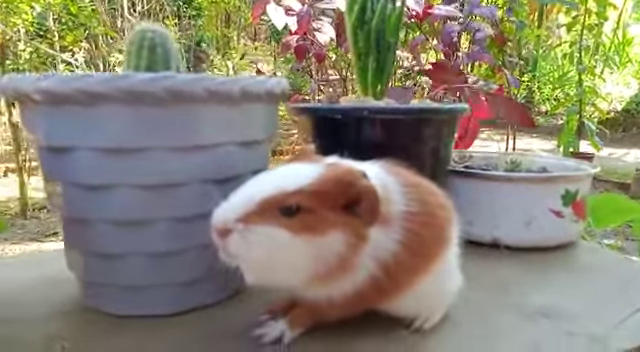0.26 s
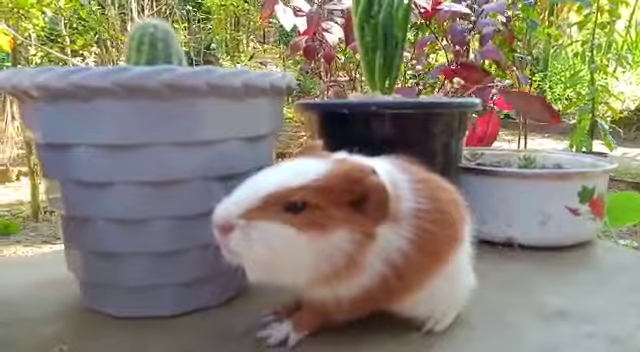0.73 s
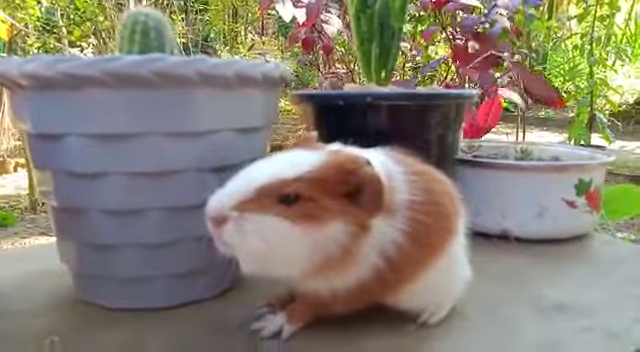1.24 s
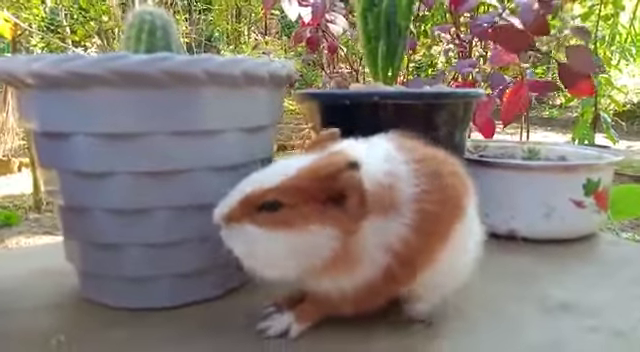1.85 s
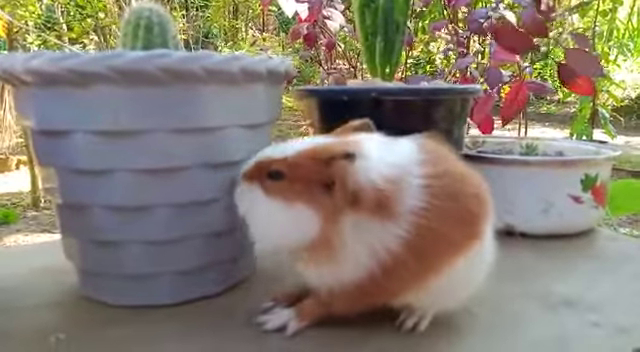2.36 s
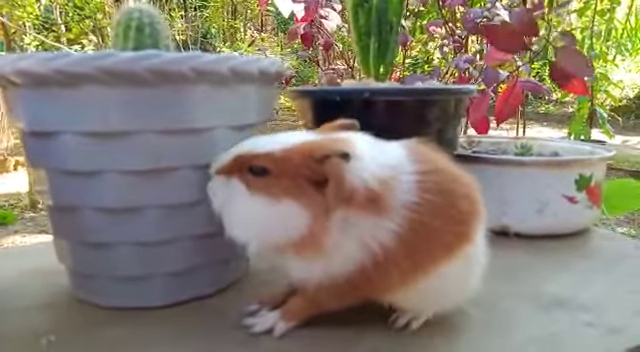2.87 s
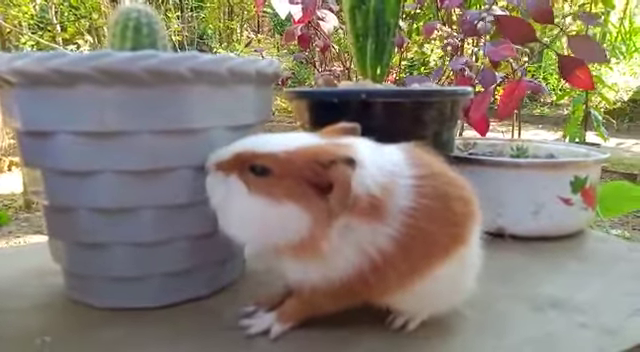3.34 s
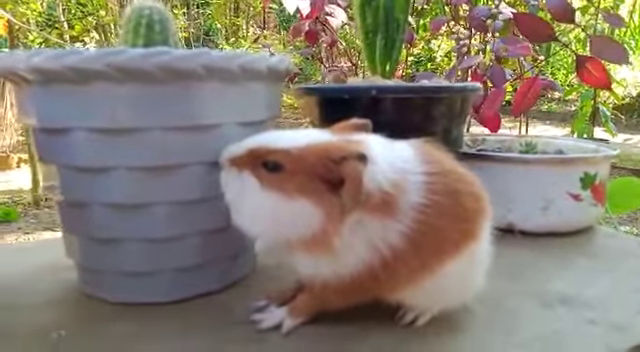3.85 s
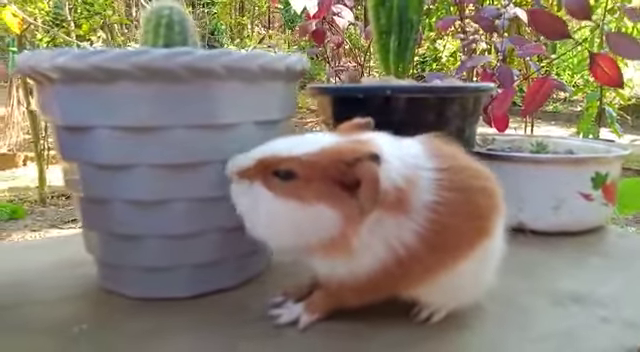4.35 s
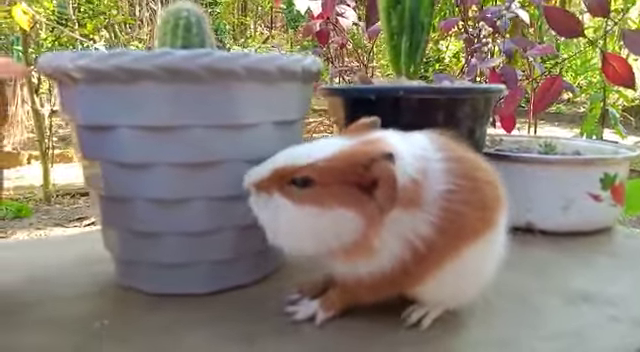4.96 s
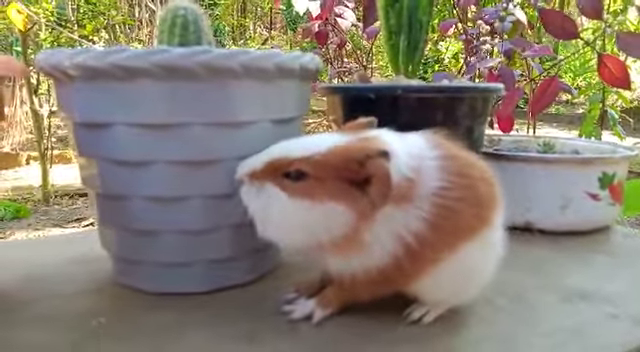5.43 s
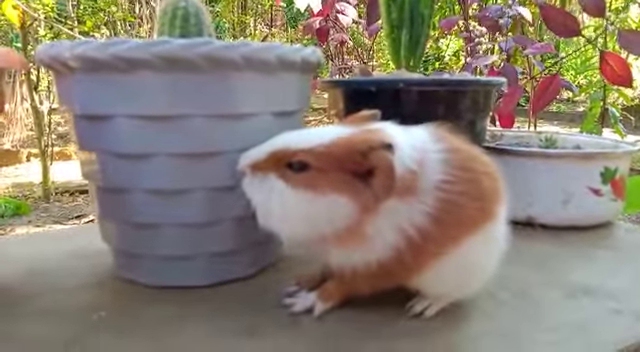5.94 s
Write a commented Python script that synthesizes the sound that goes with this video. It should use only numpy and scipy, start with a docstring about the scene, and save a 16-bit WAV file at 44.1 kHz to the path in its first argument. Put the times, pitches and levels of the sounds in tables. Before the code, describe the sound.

A guinea pig calls very close and almost dry on an outdoor patio, about six seconds long. It starts at once with a wheek: a nasal buzz near 650 Hz, a fast upward glide with rasp and breathy hiss, then a clean whistle around 3 kHz, cut off abruptly. Sixteen such calls follow, each 0.2 to 0.3 seconds, roughly 0.3 to 0.5 seconds apart. A single hard, hollow knock clicks at 0.7. From 1.3 to 3.1 the calls come quicker; those around 2.4 to 3.1 have the strongest, most piercing whistles with a little fizz. At 4.85 one call drops straight out of the previous whistle. The last begins at 6.1. Underneath run a faint low hum throbbing about thirty times a second, like a far idling engine, and soft garden air. Distant poultry-like hoots appear now and then, clearest near 4.7, with tiny bird chirps mainly between 4.3 and 5.3.

```python
"""On a garden patio, a guinea pig wheeks sixteen times, close to the microphone.
Each wheek is a stack of harmonics on a gliding pitch: a low buzzy note, a raspy rise, a clean whistle.
Shaped noise adds rasp, hiss and fizz, and a shaped impulse makes one sharp knock.
Behind them are a throbbing low hum with rumble and faint garden air (sines and noise),
far hooting calls (sines with overtones) and small birds (sine chirps, blurred)."""
import sys
import numpy as np
from scipy import signal
from scipy.fft import rfft, irfft
from scipy.io import wavfile
from scipy.ndimage import uniform_filter1d

SR = 44100
rng = np.random.default_rng(int(sys.argv[2]) if len(sys.argv) > 2 else 0)


def file_out(sig):
    """Save sig as 16-bit WAV at sys.argv[1]."""
    # one column per channel
    cols = np.atleast_2d(sig).T
    # limit, then scale
    lim = np.clip(cols, -1, 1)
    pcm = np.round(lim * 32767).astype(np.int16)
    wavfile.write(sys.argv[1], SR, pcm)


N = 273420
T = np.arange(N) / SR  # time of every sample, in seconds

# The wheeks, one a row; levels are before the gains added later:
# (start [s], time on the low note [s], time of the glide [s], time of the climb into the whistle [s],
#  length [s], first pitch [Hz], low note [Hz], whistle pitch aimed at [Hz],
#  bend of the glide [1 = even], share of pitch lost at the end [0-1],
#  buzz level [dB], glide level [dB], whistle level [dB], fade of the whistle [dB, negative swells],
#  buzz brightness [dB], glide brightness [dB], whistle brightness [dB], rasp level [dB], hiss level [dB])
WHEEKS = [ (0.0, 0.013, 0.093, .125, 0.25, 661, 653, 3112, 1.13, 0.0026, -26, -40.5, -44.5, -7, -3.5, -19, 22, -36.5, -62),
          (.412, 0.075, 0.11, .117, 0.27, 722, 677.7, 3210, 1.11, 0.064, -32, -38.5, -53.5, -11, -3.5, -15.5, 20.5, -36.5, -63.5),
          (0.876, 0.057, 0.13, 0.051, 0.24, 652, 628, 2606, 1.24, .26, -33.5, -35.5, -39.5, -10, -6, -28, -33.5, -52, -73.5),
          (1.301, 0.071, 0.092, 0.078, 0.22, 687, 635, 3373, 0.93, .16, -35, -36.5, -41.5, -2, -7.5, -35, -22, -67, -92),
          (1.675, 0.072, 0.08, .071, 0.23, 697, 610, 3283, 1.23, .015, -31, -34.5, -45, 0.5, -7, -36, -26, -41.5, -84),
          (2.025, 0.064, 0.082, 0.08, 0.26, 633, 604, 3270, 1.23, .02, -31, -34.5, -49, -6, -6, -52, -9, -47, -78),
          (2.391, 0.021, 0.057, 0.068, 0.23, 706, 774, 3113, 1.89, .07, -26.5, -34.5, -19.5, 0.5, -10.5, 2, 7.5, -69, -65),
          (2.73, 0.039, 0.088, 0.11, 0.26, 698, 765, 3085, 2.13, 0.037, -24, -27, -17.5, 9.5, 2, 5, 12.5, -58, -56),
          (3.108, 0.06, 0.11, 0.16, 0.3, 695, 707.5, 3089, 1.2, 0.052, -26.5, -32, -27.5, -2.5, 0.5, 0.5, 10, -34, -54.5),
          (3.568, .076, 0.11, .1, 0.29, 745, 684.5, 3027, 1.1, 0.012, -31, -38.5, -37, -4, -1, 0.5, 8.5, -37.5, -58),
          (4.025, .075, .123, .18, .277, 713, 665, 3439, 1.06, .11, -31.5, -37, -41.5, -8.5, -4.5, -5.5, 4.5, -39, -61),
          (4.565, 0.055, 0.13, 0.12, 0.29, 626, 636, 2993, 1.5, 0.17, -24.5, -31, -39, -7, -2.5, -21, 3, -56.5, -66),
          (4.853, 0.072, 0.095, 0.074, 0.21, 2796, 642, 3339, 1.44, .14, -28.5, -35.5, -43.5, -10, -1.5, -9, -20, -37, -63.5),
          (5.21, 0.045, 0.085, 0.11, .27, 696, 675.6, 3124, 1.45, 0.014, -30.5, -35, -35.5, -3, -9.5, -24, 16.5, -37.5, -67),
          (5.641, 0.074, .11, 0.14, 0.28, 702, 677, 3257, 1.02, .085, -32, -36.5, -43.5, -7.5, -4, -9, 7.5, -37, -70),
          (6.105, 0.07, 0.11, 0.091, 0.28, 694, 648, 3000, 1.06, .05, -34, -37.5, -38, 0, -8.5, -8.5, 9, -53, -77)]
# How the throat colours the overtones: (frequency [Hz], level [dB])
THROAT_COLOUR = [(1200, -6.5), (2100, -2), (3000, -5.5), (4000, -11.5), (5200, -20), (6200, -14.5),
                 (7200, -14.5), (9100, -8), (10500, -18), (12200, -17), (13500, -12), (15200, -26)]
# Peaks and dips that the lowest harmonic sweeps through: (frequency [Hz], level [dB])
FUNDAMENTAL_COLOUR = [(650, -1), (900, -0.5), (1030, -0.6), (1400, -0.1), (1650, 2.2), (2150, 4.5),
                      (2400, -6.5), (2520, 3.5), (2680, -9.5), (2820, 1.8), (3100, 5.5)]
# Colour of the hiss of leaking breath: (frequency [Hz], relative level [dB])
HISS_COLOUR = [(2500, -26), (4200, -4), (5300, -24), (6300, 0), (7100, 6.5), (8000, -3), (9300, -4.5),
               (10600, -24), (12500, -22.5), (14200, -17), (16000, -21.5)]
# Colour of the low rumble: (frequency [Hz], relative level [dB])
RUMBLE_COLOUR = [(13, -50), (22, -38.5), (32, -35), (59, -18.5), (81, -0.5), (114, 4), (130, -4), (151, -4),
                 (184, -5), (205, -7), (301, -15), (358, -15.5), (420, -22), (550, -44.5), (920, -120)]
# Colour of the garden air: (frequency [Hz], relative level [dB])
AIR_COLOUR = [(200, -22.5), (380, 0.5), (1000, -1), (1800, -3), (3200, -6), (4500, -12), (5900, -25.5),
              (7200, -16.5), (9500, -36), (11500, -27.5), (13500, -32.5), (15500, -55)]
# Steady notes in the hum, before throb and swell: (mean pitch [Hz], level [dB])
HUM_NOTES = [(108, -56), (124, -51)]
# Slow swell of the hum and rumble: (time [s], level [dB])
HUM_SWELL = [(0, 0.5), (1.2, -1), (2.2, 2.5), (3.2, -0.5), (4.7, -1.5), (6.2, 1)]
# Far hooting calls, before the gain of the far sounds:
# (start [s], end [s], first pitch [Hz], last pitch [Hz], level [dB], overtones against the lowest tone [dB])
HOOTS = [(.05, 0.443, 355, 327, -60.5, -30), (1.8, 2.074, 366.7, 370.8, -56, -6.5),
         (2.55, 2.999, 338.8, 334, -56.5, -29), (2.62, 2.897, 461.3, 520.4, -60, 10),
         (3.836, 3.996, 492, 472.5, -70.5, 18), (4.13, 4.298, 499, 483.6, -56, -8),
         (4.7, 4.87, 483, 467.5, -48, -14.5), (5.757, 5.881, 445.6, 423.3, -54, -3),
         (5.99, 6.085, 865, 798, -54.5, -40)]
# Colour of the knock: (frequency [Hz], relative level [dB])
KNOCK_COLOUR = [(40, -17), (150, -7.5), (600, 1), (1000, -4), (1600, -19), (1950, -21), (2400, -16),
                (3000, -8), (4000, -17), (4600, -30), (5400, -25.5), (8300, -42), (13500, -50),
                (16000, -53)]
# Small birds, before the gain of the far sounds:
# (start [s], end [s], first pitch [Hz], last pitch [Hz], level [dB])
CHIRPS = [(1.702, 2.252, 6830, 6606, -69.5), (4.316, 4.408, 2323, 2084, -56.5),
          (4.524, 4.576, 4100, 3513, -47), (4.546, 4.603, 7706, 7334, -58.5),
          (5.071, 5.196, 2736, 2477, -55), (5.132, 5.214, 10080, 9880, -63.5),
          (5.182, 5.226, 13200, 13190, -64), (5.138, 5.261, 6100, 6000, -63),
          (5.964, 6.017, 10170, 10000, -74.5)]
# How long the patio rings in each band: (frequency [Hz], time to die by 60 dB [s])
PATIO_RING = [(300, 0.53), (3000, 0.41), (9000, 0.33), (15000, 0.17)]

EDGE_HZ = 15800  # upper limit of the sound
KNOCK_S = .7152  # time of the knock
# Pitch: settles on the low note, glides to the register break, eases into the whistle, droops at the end
SETTLE_S, BREAK_HZ, EASE_POWER, DROOP_S = .042, 2363, 2.5, .01
# Level: shares of glide and climb where glide level and whistle crest are reached; latest crest before the end
GLIDE_SHARE, CREST_SHARE, CREST_LEAD_S = 0.48, 0.86, 0.034
# Depth [dB] and time constant [s] of the soft start and end
ATTACK_DB, ATTACK_S, RELEASE_DB, RELEASE_S = 13.5, 0.014, 15, .008
# Brightness: dulls as the pitch rises to DULL_HZ, then opens across the break
DULL_HZ, OPEN_LEAD_S, OPEN_LAG_S = 1500, 0.03, 0.051
# Above this level, a swell goes more into the lowest harmonic (SQUEEZE: dB of brightness lost per dB)
KNEE_DB, SQUEEZE = -28, 0.75
# The rasp sets in just after the pitch lifts and lets go just before the break
RASP_LAG_S, RASP_LEAD_S, RASP_FADE_S = .02, 0.0078, .016
FLUTTER = .27  # depth of the rasp's second oscillation
# Waver of pitch on each part (shares), and of level in the glide (dB)
BUZZ_WAVER, GLIDE_WAVER, WHISTLE_WAVER, GLIDE_WAVER_DB = .008, .016, .0018, 1.2
# A loud whistle breaks into a spurt of fizz shortly before it ends
SPURT_LEAD_S, SPURT_S, SPURT_RISE_DB = 0.028, 0.041, 13


def gain_of(db):
    """Turns decibels into amplitude."""
    return 10 ** (np.asarray(db) / 20)


def evened(x):
    """Scales a sound to an average strength (rms) of 1."""
    return x / np.sqrt(np.mean(x ** 2) + 1e-20)


def read(points, hz):
    """Reads a table between its points, on a logarithmic frequency axis."""
    point_hz, value = np.transpose(points)
    return np.interp(np.log(hz + 1), np.log(point_hz), value)


def shaped_noise(gain):
    """Noise of rms 1: random samples with each frequency scaled by a gain."""
    spectrum = rfft(rng.standard_normal(N))
    return evened(irfft(spectrum * gain, N))


def noise(points):
    """Noise of rms 1 with the colour in a table."""
    hz = np.fft.rfftfreq(N, 1 / SR)
    return shaped_noise(gain_of(read(points, hz)))


def band(centre_hz, width_hz):
    """Noise of rms 1 in a bell-shaped band; around zero it is a random wander."""
    hz = np.fft.rfftfreq(N, 1 / SR)
    return shaped_noise(np.exp(-((hz - centre_hz) / width_hz) ** 2 / 2))


def gate(start, end, fade):
    """Is one between two times, with straight ramps centred on them."""
    return np.clip(np.minimum(T - start, end - T) / fade + .5, 0, 1)


def phase_of(hz):
    """Adds up a pitch curve into the running phase of a wave."""
    return 2 * np.pi * np.cumsum(hz) / SR


def wheek(start, hold, glide, climb, length, first_hz, low_hz, top_hz, bend, droop,
          buzz_db, glide_db, whistle_db, fade_db, buzz_bright_db, glide_bright_db, whistle_bright_db):
    """Plans one call as rows of time, pitch, level and brightness: low note, glide to the break, whistle."""
    t = np.arange(0, length, 1 / 4000)
    at_break = hold + glide

    settling = np.clip(1 - t / SETTLE_S, 0, 1) ** 2
    gliding = np.clip((t - hold) / glide, 0, 1) ** bend
    climbing = 1 - np.clip(1 - (t - at_break) / climb, 0, 1) ** EASE_POWER
    hz = low_hz * (first_hz / low_hz) ** settling * (BREAK_HZ / low_hz) ** gliding
    hz = hz + (top_hz - BREAK_HZ) * climbing
    hz = hz * (1 - droop * np.exp((t - length) / DROOP_S))

    crest = min(at_break + CREST_SHARE * climb, length - CREST_LEAD_S)
    level_db = np.interp(t, [hold, hold + GLIDE_SHARE * glide, at_break, crest, length],
                         [buzz_db, glide_db, glide_db, whistle_db, whistle_db - fade_db])
    from_rest = first_hz < 2 * low_hz  # a call that falls straight out of the last whistle needs no attack
    level_db = level_db - from_rest * ATTACK_DB * np.exp(-t / ATTACK_S)
    level_db = level_db - RELEASE_DB * np.exp((t - length) / RELEASE_S)

    opened = np.interp(t, [at_break - OPEN_LEAD_S, at_break + OPEN_LAG_S], [0, 1])
    below_db = np.interp(hz, [low_hz, DULL_HZ], [buzz_bright_db, glide_bright_db])
    above_db = whistle_bright_db - SQUEEZE * np.maximum(level_db - KNEE_DB, 0)
    bright_db = (1 - opened) * below_db + opened * above_db
    return np.array([start + t, hz, level_db, bright_db])


def vocal_folds(hz, level_db, bright_db, raspy, creak, slope_db=10, buzz_fall_db=1.5,
                second_share=0.36, upper_share=0.85, shrill=0.24, buzz_shrill=0.73,
                jitter=0.00224, buzz_jitter=0.0171, rasp_jitter=0.02646, shimmer=0.0042, creak_depth=0.4):
    """Stacks the harmonics of the vibrating folds, coloured by the throat; returns the wave and its phase."""
    slack = np.interp(hz, [900, 2400], [1, 0])  # slack folds keep time less well than tight ones
    unsteady = jitter * band(0, 150) + buzz_jitter * slack * band(120.3, 170)
    unsteady = unsteady + rasp_jitter * raspy * band(0, 360)
    phase = phase_of(hz * (1 + unsteady))

    # the louder the call, the harder the folds snap shut and the stronger the top harmonics
    shrill_db = shrill * (1 - slack) * np.maximum(level_db + 33, -6)
    shrill_db = shrill_db + buzz_shrill * slack * np.maximum(level_db + 25.5, -7)

    wave = gain_of(read(FUNDAMENTAL_COLOUR, hz)) * np.sin(phase)
    for k in range(2, 14):
        # pressing the folds harder lifts the third harmonic most
        share = np.interp(k, [2, 3, 4], [second_share, 1, upper_share])
        above_third = max(k - 3, 0)
        db = read(THROAT_COLOUR, k * hz) - slope_db * np.log2(k / 2) + share * bright_db
        db += shrill_db * min(above_third, 1) - buzz_fall_db * slack * above_third
        wave += gain_of(db) * (k * hz < EDGE_HZ) * np.sin(k * phase)

    # a second, wavering oscillation puts stray partials beside the harmonics
    flutter = FLUTTER * raspy * band(696, 130)
    creaking = creak_depth * creak * band(220, 220)
    return wave * (1 + shimmer * band(0, 900) + flutter + creaking), phase


def guinea_pig(flick=0.066, half_db=-15, rasp_db=-4, crackle=0.19, rise_hiss_db=-26,
               whistle_hiss_db=-41, spurt_db=3, low_cut_hz=420):
    """Sounds the wheeks: folds tighten from buzz to whistle, beat irregularly on the rise and leak air."""
    s, *columns = np.hstack([wheek(*row[:-2]) for row in WHEEKS])
    s = np.maximum.accumulate(s)  # keeps time running forwards where calls overlap
    hz, level_db, bright_db = (np.interp(T, s, column) for column in columns)
    spans = [(start, start + length) for start, _, _, _, length, *_ in WHEEKS]
    rasps = [(start + hold + RASP_LAG_S, start + hold + glide - RASP_LEAD_S, db)
             for start, hold, glide, *_, db, _ in WHEEKS]
    sounding = np.minimum(sum(gate(start, end + .002, 0.003) for start, end in spans), 1)
    level = gain_of(level_db) * sounding

    # pitch and level never sit quite still
    stages_hz = [750, 1050, 2200, 2800]
    waver = np.interp(hz, stages_hz, [BUZZ_WAVER, GLIDE_WAVER, GLIDE_WAVER, WHISTLE_WAVER])
    hz = hz * (1 + waver * band(0, 26))
    waver_db = np.interp(hz, stages_hz, [0, GLIDE_WAVER_DB, GLIDE_WAVER_DB, 0])
    level = level * gain_of(waver_db * band(0, 40))

    # the pitch flicks up as the folds close at the end
    closing = sum(gate(end - .002, end + .008, 0.002) for _, end in spans)
    hz = uniform_filter1d(hz, size=300) * (1 + flick * closing)

    # the folds need a moment to settle
    creak = sum(gate(start - .01, start + 0.022, 0.033) for start, _ in spans)
    raspy = sum(gate(start, end, RASP_FADE_S) * np.interp(db, [-55, -40], [.6, 1])
                for start, end, db in rasps)
    voice, phase = vocal_folds(hz, level_db, bright_db, raspy, creak)

    # as the rasp lets go, strong and weak cycles alternate and sound the octave below
    doubling = sum(gate(end - .022, end + .025, 0.013) * min(gain_of(db + 33), 1) for _, end, db in rasps)
    octave_below = np.sin(phase / 2) + 1.2 * np.sin(3 * phase / 2)
    voice += gain_of(half_db) * doubling * octave_below * (1 + 0.64 * band(0, 120))

    # chaotic cycles fill the lowest throat resonance in uneven bursts
    resonance = band(1850, 400) + 0.44 * band(825, 260) + 0.065 * band(2200, 730)
    chaos = evened(resonance * np.exp(crackle * band(0, 250)))
    rasp_level = sum(gain_of(db) * gate(start, end, RASP_FADE_S) for start, end, db in rasps)
    rasp = gain_of(rasp_db) * chaos * rasp_level

    # air leaks in puffs through the slack folds
    hiss_db = np.interp(T, np.ravel(spans), [row[-1] for row in WHEEKS for _ in ("start", "end")])
    slack = np.interp(hz, [2200, 2800], [1, 0])
    leak = slack * np.minimum(level / gain_of(-39), 1) * gain_of(hiss_db)
    # the airflow takes a moment to build, longer where the hiss is faint
    build_s = np.interp(hiss_db, [-66, -56], [.09, .02])
    flow = sum(np.clip((T - start) / build_s, 0, 1) * (T < end + .01) for start, end in spans)
    puffs = 1 + 0.51 * np.cos(phase)
    hiss = leak * np.minimum(flow, 1) * noise(HISS_COLOUR) * puffs

    # a higher fizz swells at the top of the rise and comes in spurts on the loudest whistles
    rise = np.interp(hz, [1100, 2200, 2650], [0, 1, 0]) * gain_of(rise_hiss_db + .5 * bright_db)
    late = sum(gate(end - SPURT_LEAD_S - SPURT_S / 2, end - SPURT_LEAD_S + SPURT_S / 2, .015)
               for _, end in spans)
    loud = np.interp(level_db, [-27, -19], [0, 1]) * (hz > BREAK_HZ)
    spurts = loud * gain_of(whistle_hiss_db + SPURT_RISE_DB * late + spurt_db * band(0, 16))
    fizz = level * (rise + spurts) * evened(band(8300, 1200) + .8 * band(13800, 1700))

    # the voice carries nothing below a few hundred hertz
    low_cut = signal.butter(4, low_cut_hz, "highpass", fs=SR, output="sos")
    return signal.sosfilt(low_cut, level * voice + rasp + hiss + fizz)


def background(rumble_db=-50.5, air_db=-56, throb=0.46, air_swell_db=2.63):
    """Puts a throbbing low hum, like a far engine idling, under soft garden air: wavering sines and noise."""
    hum = sum(gain_of(db) * np.sin(phase_of(hz * (1 + 0.0272 * band(0, 6.45)))) for hz, db in HUM_NOTES)
    rumble = gain_of(rumble_db) * noise(RUMBLE_COLOUR)
    air = gain_of(air_db + air_swell_db * band(0, 0.43)) * noise(AIR_COLOUR)
    beat = 1 + throb * np.sin(phase_of(30.4 + band(0, 2)))  # about 30 throbs a second
    swell = gain_of(np.interp(T, *np.transpose(HUM_SWELL)))
    return (hum + rumble) * beat * swell + air


def hoots(waver=0.018):
    """Sounds far held calls, perhaps poultry: a wavering sine with a nasal stack of overtones."""
    out, wander = np.zeros(N), 1 + waver * band(0, 25)
    for start, end, first_hz, last_hz, db, overtones_db in HOOTS:
        on = gate(start, end, 0.037)
        at = on > 0
        phase = phase_of(np.interp(T[at], [start, end], [first_hz, last_hz]) * wander[at])
        overtones = sum(gain_of(k_db) * np.sin(k * phase) for k, k_db in enumerate([0, -1, -11, -4], start=2))
        out[at] += gain_of(db) * on[at] * (np.sin(phase) + gain_of(overtones_db) * overtones)
    return out


def knock(peak_db=-9):
    """Makes one hard, dry tap from a coloured impulse: a hollow body under a brighter click."""
    log_gain = np.log(gain_of(read(KNOCK_COLOUR, abs(np.fft.fftfreq(N, 1 / SR)))))
    # this phase makes the tap ring only after it is struck
    tap = np.fft.ifft(np.exp(np.conj(signal.hilbert(log_gain)))).real
    return gain_of(peak_db) * np.roll(tap, round(KNOCK_S * SR)) / abs(tap).max()


def birds(blur_hz=130):
    """Sounds thin chirps: gliding sines with a random wobble, blurred by distance and foliage."""
    out, blur = np.zeros(N), band(0, blur_hz)
    for start, end, first_hz, last_hz, db in CHIRPS:
        phase = phase_of(np.interp(T, [start, end], [first_hz, last_hz]))
        out += gain_of(db) * gate(start, end, 0.018) * np.sin(phase)
    return out * blur


def patio(x):
    """Adds a thin diffuse tail from pots and walls: noise whose bands each die at their own speed."""
    hz, t, z = signal.stft(rng.standard_normal(SR // 2), SR, nperseg=256)
    decay = gain_of(-60 * t / read(PATIO_RING, hz)[:, None])
    tail = signal.istft(z * decay, SR, nperseg=256)[1]
    tail = np.pad(tail, (SR // 200, 0))  # the echo arrives 5 ms late
    return signal.fftconvolve(x, tail / np.linalg.norm(tail))[:N]


def scene(voice_db=3, near_wet_db=-27, far_db=1, far_wet_db=-5):
    """Mixes the layers: near sounds are almost dry, far sounds carry more echo."""
    near = gain_of(voice_db) * guinea_pig() + knock()
    far = gain_of(far_db) * (hoots() + birds())
    echo = patio(gain_of(near_wet_db) * near + gain_of(far_wet_db) * far)
    return (near + far + echo + background())[None]


def record(dry):
    """Applies the recorder's band limit: a filter that removes the treble above the edge."""
    lowpass = signal.firwin(511, EDGE_HZ, window=("kaiser", 9), fs=SR)
    return signal.oaconvolve(dry, lowpass[None], "same")


dry = scene()
out = record(dry)
file_out(out)
```